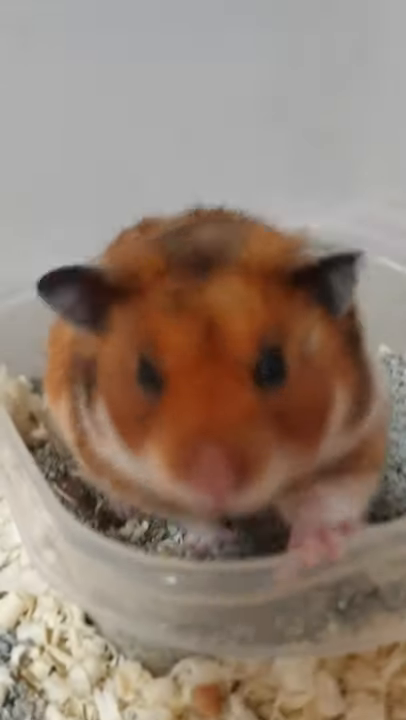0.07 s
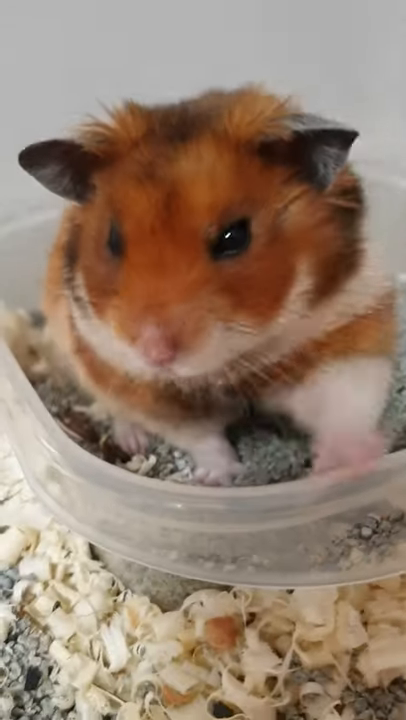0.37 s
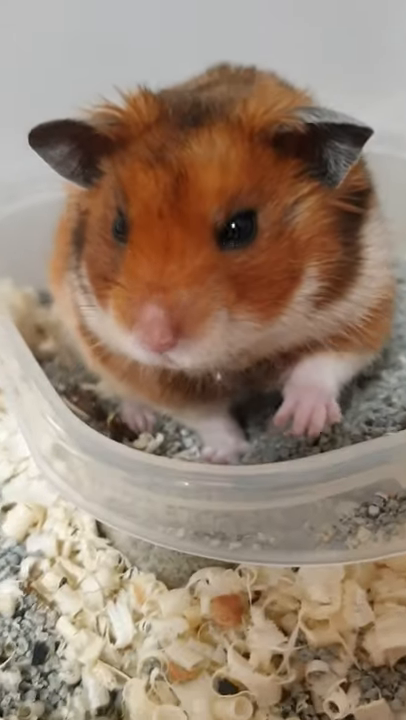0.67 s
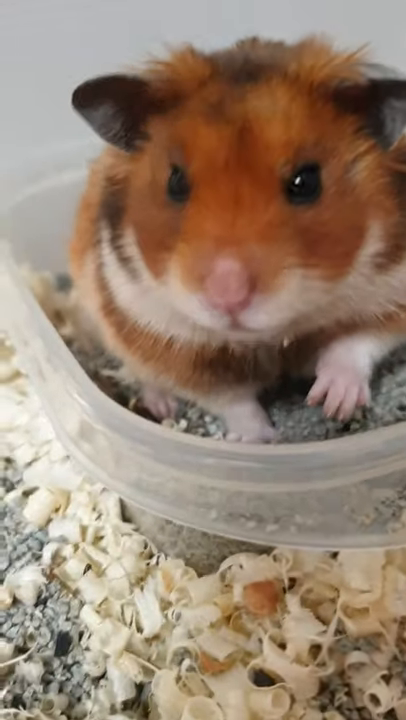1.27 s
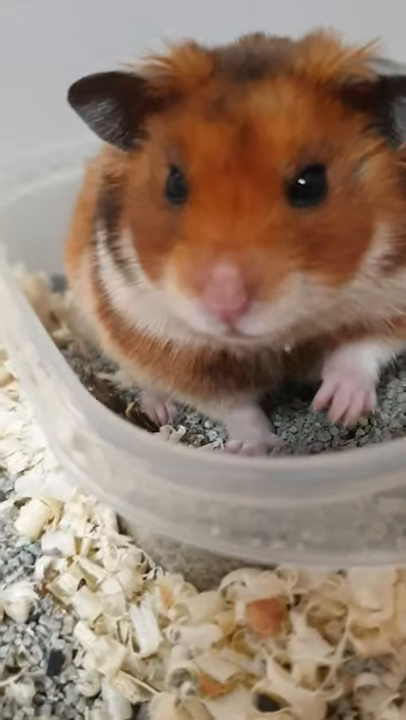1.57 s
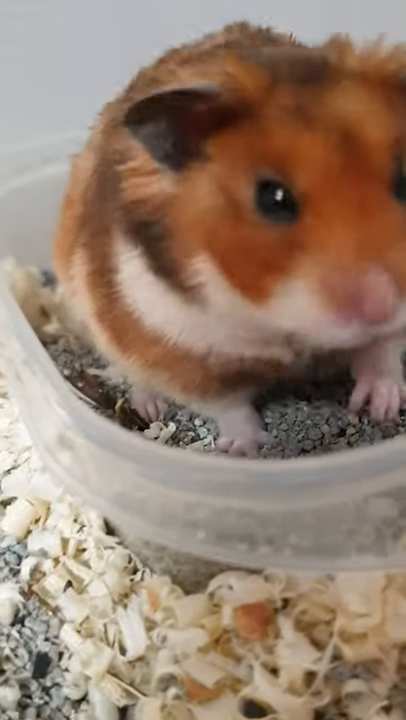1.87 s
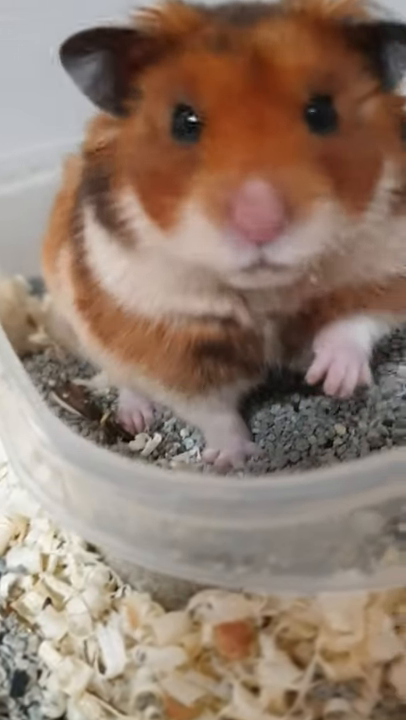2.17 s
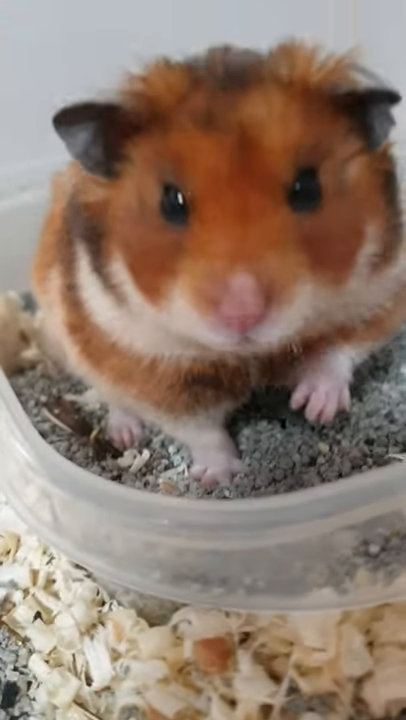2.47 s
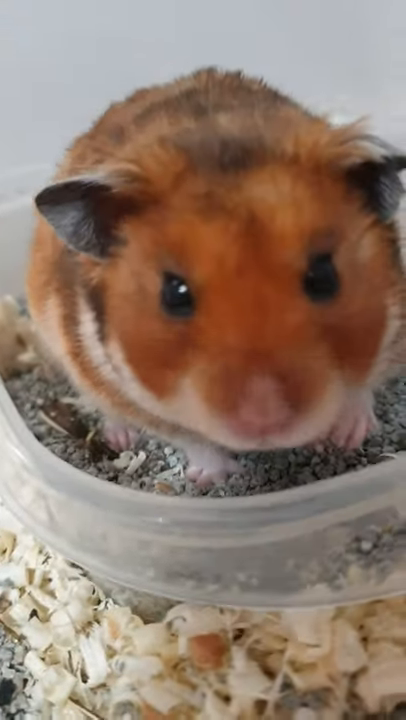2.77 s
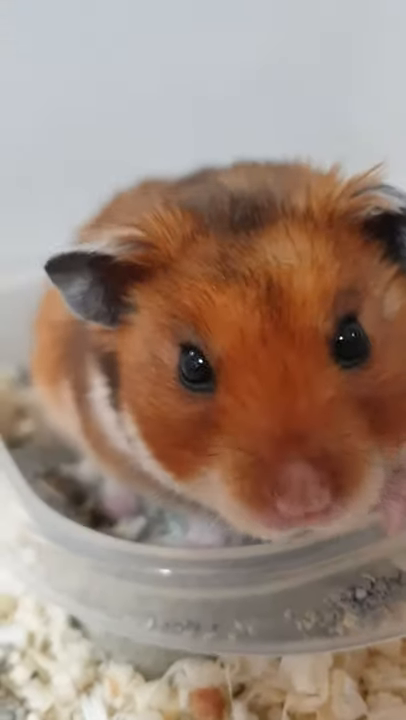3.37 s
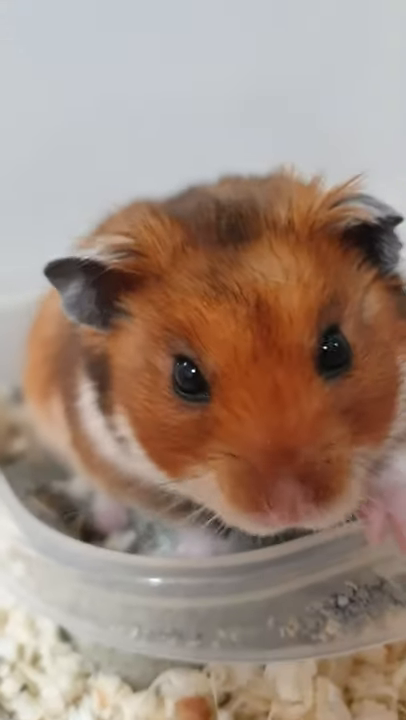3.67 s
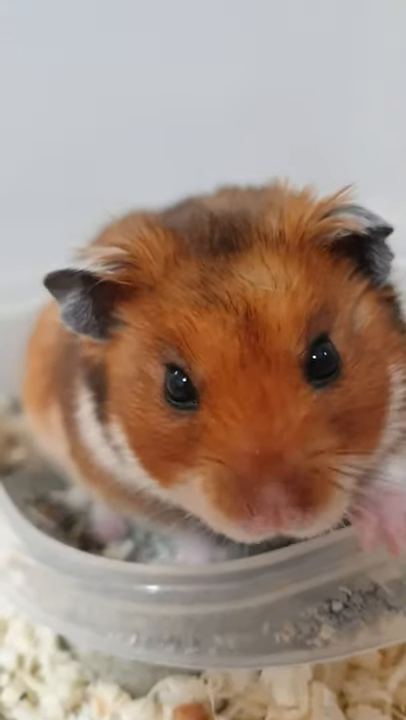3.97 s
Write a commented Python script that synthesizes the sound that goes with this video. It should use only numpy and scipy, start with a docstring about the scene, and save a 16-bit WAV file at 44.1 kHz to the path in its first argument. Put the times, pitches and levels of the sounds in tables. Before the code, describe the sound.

Dry, gritty scratching from a hamster moving in a sandy plastic tub starts faintly after a soft bump. It grows louder and more crackly, with light hollow knocks, then stops. The sound is close, mostly right, in a quiet room.

```python
"""A hamster shifts about in a plastic tub of sand and wood shavings, in a quiet room.
After a soft bump, sliding grains build into a dry, gritty rubbing close to the right microphone.
It breaks into scrapes and sharp ticks as grains catch and snap free; paws thump, the tub rings
hollow, and the movement stops. The left microphone gets only a faint, dull part of it."""
import sys
import numpy as np
from scipy import signal
from scipy.fft import rfft, irfft
from scipy.io import wavfile

SR = 44100
rng = np.random.default_rng(int(sys.argv[2]) if len(sys.argv) > 2 else 0)


def unload_wav(signal):
    """Save mono or channel-first audio to the path in sys.argv[1] as 16-bit WAV at rate SR, clipped to [-1, 1]."""
    wavfile.write(
        sys.argv[1],
        SR,
        np.round(np.clip(np.atleast_2d(signal).T, -1, 1) * 32767).astype(np.int16),
    )


N = 176400
T = np.arange(N) / SR
CLUMP_S, SLIP_S = 0.0035, 0.028  # grains give way in clumps, clumps in slips
IMPACT_LEFT_DB = -43
# grain spectrum at the left microphone: (frequency [Hz], density [dB])
FAR_SPECTRUM = [(40, 0), (150, 17.5), (260, 8), (360, 18), (470, 3), (1000, 3.5), (1700, 2), (2800, 1.5),
                (4000, 5.5), (6000, -1.5), (10000, -1), (14500, -8.5)]


def amp(db):
    """Decibels to gain."""
    return 10 ** (np.asarray(db) / 20)


def unit(x):
    """Scale to rms 1."""
    return x / np.sqrt(np.mean(x ** 2) + 1e-20)


def curve(rows):
    """Interpolate each column over the time in the first."""
    time_s, *columns = np.transpose(rows)
    return [np.interp(T, time_s, column) for column in columns]


def add(mix, time_s, sound):
    """Mix a sound in at time_s."""
    part = mix[max(round(time_s * SR), 0):][:len(sound)]
    part += sound[:len(part)]


def colour(x, spectrum):
    """Minimum-phase filter of unit energy with the given spectrum."""
    hz, db = np.transpose(spectrum)
    bin_hz = abs(np.fft.fftfreq(4096, 1 / SR))
    log_gain = np.log(amp(np.interp(np.log(bin_hz + 1), np.log(hz + 1), db)))
    response = np.exp(np.conj(signal.hilbert(log_gain)))
    taps = np.fft.ifft(response).real[:2048]
    return signal.oaconvolve(x, taps / np.linalg.norm(taps))[:len(x)]


def noise(spectrum):
    """Steady coloured noise, rms 1."""
    return unit(colour(rng.standard_normal(N), spectrum))


def wander(span_s):
    """Smooth random drift over span_s, rms 1."""
    lowpass = np.exp(-(2 * np.fft.rfftfreq(N, 1 / SR) * span_s) ** 2)
    return unit(irfft(rfft(rng.standard_normal(N)) * lowpass, N))


def burst(sound, db):
    """Scale a brief sound to the energy of 1 ms at db."""
    return amp(db) * np.sqrt(SR / 1000) * sound / np.linalg.norm(sound)


def room():
    """Low rumble, nearly the same on both sides, and faint air."""
    # spectra: (frequency [Hz], density [dB])
    rumble_spectrum = [(18, -39), (30, -22), (60, 3.5), (85, -4), (125, -12.5), (250, -19), (450, -38),
                       (8000, -69)]
    air_left = [(100, 1), (500, -14), (1400, -11), (2000, -3), (2400, 1.5), (2850, 3.5), (3100, -14),
                (3900, -10), (9000, -39), (13000, -17)]
    air_right = [(100, 3), (450, 0.5), (900, 3.5), (1300, -2), (2000, -23), (4000, -32), (9000, -36),
                 (13000, -15)]
    correlation = 0.82
    left = noise(rumble_spectrum)
    right = correlation * left + np.sqrt(1 - correlation ** 2) * noise(rumble_spectrum)
    air = np.array([amp(-69) * noise(air_left), amp(-72) * noise(air_right)])
    return amp(-53) * np.array([left, right]) + air


def bump():
    """A soft knock with a low shudder, equal on both sides."""
    # shudder modes: (frequency [Hz], level [dB], decay [s])
    modes = [(34.9, -40.5, 0.16), (59.6, -43.5, 0.17), (120, -38.5, 0.026), (214, -45.5, 0.027)]
    # knock spectrum: (frequency [Hz], density [dB])
    knock_spectrum = [(100, 6.5), (300, -4), (620, -8.5), (850, -17), (1100, -15), (1600, -31), (4000, -43)]
    start_s, rise_s, decay_s = 0.178, 0.0023, 0.025
    t = np.maximum(T - start_s, 0)
    shudder = sum(amp(db) * np.sin(2 * np.pi * hz * t) * np.exp(-t / ring_s) for hz, db, ring_s in modes)
    envelope = amp(-42) * np.minimum(t / rise_s, 1) * np.exp(-t / decay_s)
    return shudder + envelope * noise(knock_spectrum)


def grains(per_s, spread_db, swell_db, decay_s, kinds=24):
    """Tiny impacts, mostly small, of varied colour; they swell together where the grains slip."""
    t = np.arange(400) / SR
    spectra = rfft(rng.standard_normal((kinds, len(t))) * np.exp(-t / decay_s))
    shapes = irfft(spectra / np.sqrt(np.mean(abs(spectra) ** 2, 0)))  # white on average
    size = amp(spread_db * np.minimum(rng.exponential(1, N), 4.5))
    sign = rng.choice([-1., 1.], N)
    hits = size * sign * (rng.random(N) < per_s / SR) * amp(swell_db)
    kind = rng.integers(0, kinds, N)
    onsets = np.flatnonzero(hits)
    out = np.zeros(N + len(t))
    for k in range(len(t)):
        out[onsets + k] += hits[onsets] * shapes[kind[onsets], k]
    return unit(out[:N])


def rubbing():
    """Sliding grains: bright grit and dull scuffing share slips; pressure makes them fuller, rougher."""
    # steady rubbing: (time [s], grit [dB], scuffing [dB])
    near_levels = [(0.1, -86, -96), (0.23, -59.5, -67), (0.4, -58, -67.5), (0.55, -51.5, -60),
                   (0.67, -57.5, -63.5), (0.71, -63.5, -91), (0.96, -65, -96), (1.09, -51, -66),
                   (1.16, -45, -53.5), (1.25, -46.5, -51.5), (1.33, -46, -50.5), (1.52, -48.5, -53),
                   (1.68, -44, -48.5), (1.94, -41.5, -46.5), (2.1, -37.5, -43), (2.28, -36.5, -38),
                   (2.38, -35, -37.5), (2.52, -33.5, -38.5), (2.61, -39, -43), (2.76, -37.5, -42.5),
                   (2.86, -35.5, -40), (2.99, -34.5, -39.5), (3.08, -38, -43), (3.19, -34.5, -39.5),
                   (3.28, -38.5, -42.5), (3.4, -35.5, -40.5), (3.44, -39, -42.5), (3.56, -32, -36),
                   (3.67, -39, -42), (3.76, -35, -34), (3.85, -36.5, -39), (3.89, -48, -52.5),
                   (3.96, -53, -52), (4, -58, -65)]
    # rubbing at the left microphone: (time [s], level [dB])
    far_levels = [(0, -84), (1.1, -78), (1.17, -65), (1.25, -58), (1.5, -60.5), (1.75, -55), (1.95, -53.5),
                   (2.1, -49.5), (2.4, -45.5), (2.65, -53), (3, -51), (3.12, -54), (3.52, -49.5),
                  (3.85, -52.5), (3.92, -66), (4, -78)]
    # short harder scrapes: (centre [s], half length [s], grit [dB], scuffing [dB])
    scrapes = [(2.51, 0.025, -33, -41.5), (3.33, 0.012, -42, -45), (3.508, 0.0096, -29.5, -31.5),
               (3.542, 0.0067, -33, -34.5), (3.724, 0.0081, -35.5, -40), (3.804, 0.0086, -31, -37.5)]
    # load on the grains: (time [s], pressure [0-1])
    load = [(1.11, 0.12), (1.2, 0.5), (1.9, 0.27), (2.5, 0.63), (3.5, 1), (3.85, 0.95), (3.9, 1)]
    # spectra: (frequency [Hz], density [dB])
    pressed_grit = [(300, -23.5), (900, -3), (1900, -7), (3000, 1), (4200, 1.5), (6300, -1), (7800, 1.5),
                    (9000, -5.5), (10200, -3), (11800, 0.5), (14500, -3)]
    light_grit = [(300, 2.5), (900, -6), (1900, -18), (3200, -7.5), (4700, -0.5), (6300, -1), (7700, 3.5),
                  (9000, -3.5), (11800, 1), (14500, -4)]
    scuff_spectrum = [(25, -18.5), (90, 2.5), (180, 0.5), (330, 1.5), (600, -0.5), (1100, -2.5),
                      (1700, -6.5), (3000, -8.5), (8000, -37)]
    shuffle_spectrum = [(22, -32), (55, -9.5), (90, 3), (150, -3), (260, -10), (600, -33)]

    grit_power, scuff_power = amp(curve(near_levels)) ** 2
    for centre_s, half_s, grit_db, scuff_db in scrapes:
        stroke = np.exp(-((T - centre_s) / half_s) ** 2)
        grit_power += stroke * amp(grit_db) ** 2
        scuff_power += stroke * amp(scuff_db) ** 2
    pressure = curve(load)[0]
    uneven = 0.53 + 0.55 * pressure
    slips = uneven * (wander(CLUMP_S) + 0.98 * wander(SLIP_S))

    fine = grains(per_s=4200, spread_db=2.5 * uneven, swell_db=1.5 * slips, decay_s=0.0002)
    coarse = grains(per_s=1800, spread_db=2.5 * uneven, swell_db=2.0 * slips, decay_s=0.0017)
    grit = pressure * colour(fine, pressed_grit) + (1 - pressure) * colour(fine, light_grit)
    scuff = colour(coarse, scuff_spectrum)
    near = np.sqrt(grit_power) * grit + np.sqrt(scuff_power) * (scuff + tub_ring(scuff))
    far_grains = grains(per_s=3500, spread_db=2.0, swell_db=2.3 * slips, decay_s=0.00065)
    far = amp(curve(far_levels)[0]) * colour(far_grains, FAR_SPECTRUM)
    # low shuffling loosely follows the scuffing
    shuffle = amp(-54) * unit(scuff_power ** 0.19) * noise(shuffle_spectrum)
    return np.array([far, near]) + shuffle * amp([[-2.5], [0]])


def tub_ring(scuff):
    """Scuffing excites the tub's hollow note, which shifts with the animal's weight."""
    # tub resonance: (time [s], pitch [Hz], level re scuffing [dB])
    resonance = [(2.3, 470, -22), (2.8, 720, -17), (2.92, 680, -7.5), (3.3, 500, -21), (3.85, 610, -3),
                 (3.93, 590, -8)]
    width_hz, waver = 74, 0.042
    hz, db = curve(resonance)
    hz = hz * (1 + waver * wander(SLIP_S))
    carrier = np.exp(2j * np.pi * np.cumsum(hz) / SR)
    pole = np.exp(-np.pi * width_hz / SR)
    baseband = signal.lfilter([1 - pole], [1, -pole], scuff / carrier)
    return amp(db) * unit((carrier * baseband).real)


def rough_tone(t, hz, width_hz):
    """A tone whose phase stumbles, as when rough surfaces stay in contact."""
    stumble = np.cumsum(rng.standard_normal(len(t))) * np.sqrt(2 * np.pi * width_hz / SR)
    return np.sin(2 * np.pi * hz * t + stumble)


def ticks():
    """Grains catch and snap free: a brief crack, the grain's short ring and a low push."""
    # snaps: (time [s], crack [dB], crack length [s], ring [dB], ring pitch [Hz], push [dB])
    snaps = [(0.624, -56, 0.0018, -46, 7800, -78), (0.76, -48.5, 0.0013, -50, 6100, -65),
             (.7855, -59, .0015, -51, 8000, -72), (1.243, -34.5, 0.0022, -50, 2180, -60),
             (1.407, -31.5, 0.00078, -35, 7500, -39), (1.574, -27.5, 0.0022, -33, 11400, -41),
             (1.67, -35, 0.00065, -35.5, 7560, -40), (1.7135, -33.5, 0.0016, -34, 10800, -31.5),
             (1.8103, -31.5, 0.00091, -25.5, 7300, -39), (2.081, -34, 0.00092, -41, 4020, -52),
             (2.2286, -23.5, 0.0035, -21, 7260, -35), (2.232, -30, 0.0009, -26.5, 5000, -45),
             (2.3675, -26, 0.004, -26.5, 1980, -46), (2.379, -27, 0.0011, -40, 1900, -34),
             (2.39, -22, 0.0037, -29, 4400, -33), (2.484, -31, 0.0015, -29.5, 4260, -32),
             (2.546, -26, 0.00062, -30, 8040, -52), (2.551, -25, 0.00098, -26, 3420, -43),
             (2.618, -33, 0.001, -28, 7700, -44), (2.654, -29, 0.0022, -29.5, 4640, -55),
             (2.7287, -26.5, 0.0034, -33, 4800, -27.5), (2.814, -25, 0.0011, -27, 4900, -42),
             (2.826, -24, 0.00061, -40, 3370, -30.5), (2.851, -36, 0.0007, -32, 12000, -48),
             (2.911, -22, 0.00073, -36, 12700, -26), (2.9233, -24.5, 0.00081, -28, 3680, -28),
             (2.933, -29, 0.0012, -21, 7230, -43), (2.9592, -32, 0.00054, -32.5, 4060, -35),
             (3.008, -18.5, 0.00079, -24, 3940, -41), (3.034, -21.5, 0.00064, -32, 4200, -29),
             (3.132, -29, .0008, -31, 4560, -34), (3.15, -25.5, 0.0016, -28, 11900, -38),
             (3.1586, -19, 0.00041, -18.5, 11500, -30), (3.1725, -21.5, 0.00057, -28, 4240, -32),
             (3.213, -29, .0008, -32, 5040, -49), (3.227, -29, 0.00088, -27, 7500, -35),
             (3.263, -27, 0.0017, -26, 2260, -41), (3.298, -26.5, 0.0014, -36, 3560, -38),
             (3.3235, -19.5, 0.00023, -20, 10900, -30), (3.3356, -23, 0.0019, -29, 1970, -30.5),
             (3.3437, -23, 0.0028, -25, 3730, -33), (3.457, -28.5, 0.0012, -34, 3330, -51),
             (3.4785, -21, 0.0055, -23, 1640, -25), (3.495, -21, 0.0023, -17, 2860, -40),
             (3.5987, -16.5, 0.00076, -21, 13400, -26), (3.624, -23.5, 0.001, -31, 3500, -35),
             (3.632, -25, .0012, -26.5, 4500, -27), (3.6916, -27.5, 0.0016, -28, 12900, -47),
             (3.7072, -25, 0.0012, -27, 5200, -50), (3.7176, -25, 0.0017, -28, 3630, -19.5),
             (3.7294, -20, 0.0013, -22, 3250, -22), (3.7778, -29, 0.0012, -18.5, 1800, -23),
             (3.7853, -17, 0.002, -24.5, 3700, -24), (3.7922, -27, 0.0011, -20, 1700, -38),
             (3.7998, -24, 0.0037, -26, 2470, -26), (3.8155, -23.5, 0.0015, -26, 3220, -41),
             (3.84, -25.5, 0.0017, -27, 5970, -39), (3.864, -23, 0.0011, -27, 5750, -26.5),
             (3.9229, -26, 0.00068, -31, 3200, -38), (3.961, -37, 0.0015, -39.5, 3200, -45)]
    ring_decay_s, push_hz, push_rise_s = 0.0011, 797, 0.00039
    cracks, rings, pushes = np.zeros((3, N))
    t = np.arange(1500) / SR
    for time_s, crack_db, length_s, ring_db, ring_hz, push_db in snaps:
        crack = rng.standard_normal(len(t)) * t * np.exp(-t / (0.33 * length_s))
        ring = rough_tone(t, ring_hz, width_hz=400) * np.exp(-t / ring_decay_s)
        push = rough_tone(t, push_hz, width_hz=push_hz / 10) * t * np.exp(-t / push_rise_s)
        add(cracks, time_s, burst(crack, crack_db))
        add(rings, time_s, burst(ring, ring_db))
        add(pushes, time_s, burst(push, push_db))
    # close crack spectrum: (frequency [Hz], density [dB])
    crack_spectrum = [(200, -22), (1200, 0.5), (3300, 3.5), (5500, 1.5), (7600, 3), (9200, -1.5),
                      (12000, 3), (14500, -2)]
    near = colour(cracks, crack_spectrum) + rings + pushes
    far = amp(IMPACT_LEFT_DB) * (colour(cracks, FAR_SPECTRUM) + pushes)
    return np.array([far, near])


def paw_thumps():
    """Paws press down, each with a low, heavily damped swing."""
    # presses: (time [s], level [dB], pitch [Hz])
    presses = [(1.575, -22.5, 348), (1.715, -30.5, 250), (1.8096, -27, 200), (2.368, -28, 280),
               (3.3453, -28, 200), (3.6237, -23, 446), (3.717, -25, 445), (3.8007, -19, 280)]
    decay_cycles = 0.5
    out, t = np.zeros(N), np.arange(2000) / SR
    for time_s, db, hz in presses:
        swing = np.sin(2 * np.pi * hz * t) * np.exp(-t * hz / decay_cycles)
        add(out, time_s, burst(swing, db))
    return out


def hollow_knocks():
    """Harder slips ring hollow for a moment."""
    # hard slips: (time [s], level [dB], pitch [Hz])
    hard_slips = [(2.9341, -21, 676), (3.539, -21.5, 418), (3.7289, -23, 550), (3.802, -17, 1135)]
    decay_s = 0.0029
    out, t = np.zeros(N), np.arange(2000) / SR
    for time_s, db, hz in hard_slips:
        add(out, time_s, amp(db) * np.sin(2 * np.pi * hz * t) * np.exp(-t / decay_s))
    return out


def scene():
    """All sources at the left (far) and right (near) microphones."""
    pan = amp([[IMPACT_LEFT_DB], [0]])
    return room() + bump() + rubbing() + ticks() + pan * (paw_thumps() + hollow_knocks())


def record(dry):
    """The recorder's band limit."""
    cutoff_hz = 14850
    lowpass = signal.firwin(401, cutoff_hz, window=("kaiser", 8), fs=SR)
    return signal.oaconvolve(dry, lowpass[None], "same", axes=1)


dry = scene()
out = record(dry)
unload_wav(out)
```